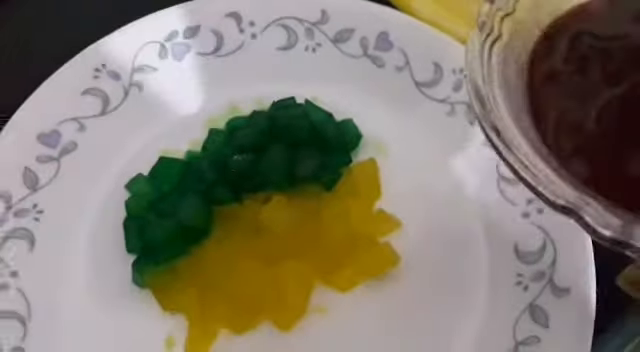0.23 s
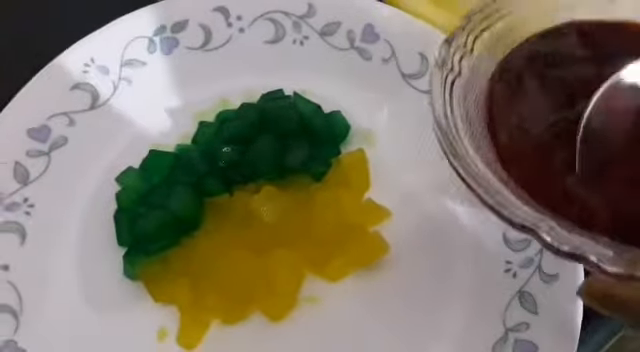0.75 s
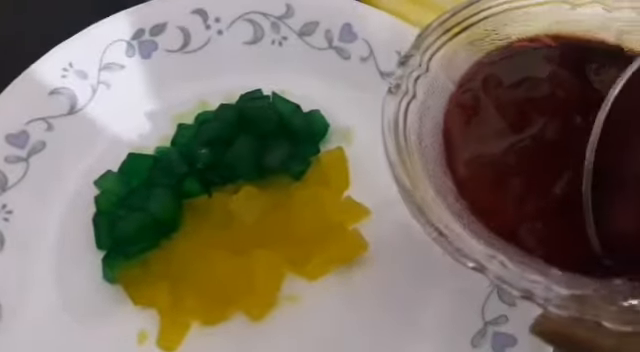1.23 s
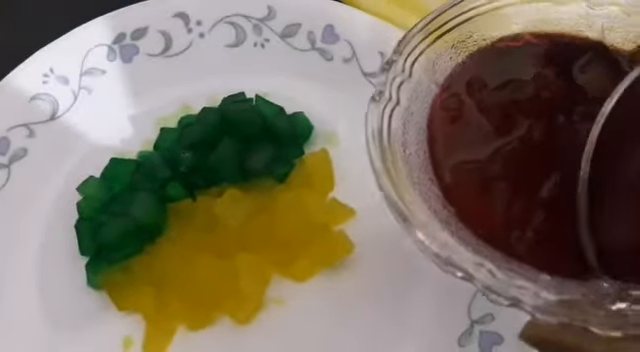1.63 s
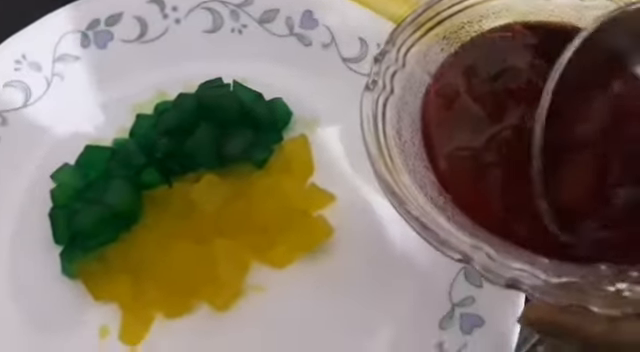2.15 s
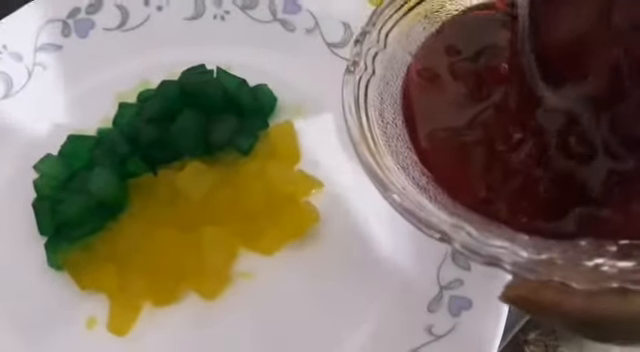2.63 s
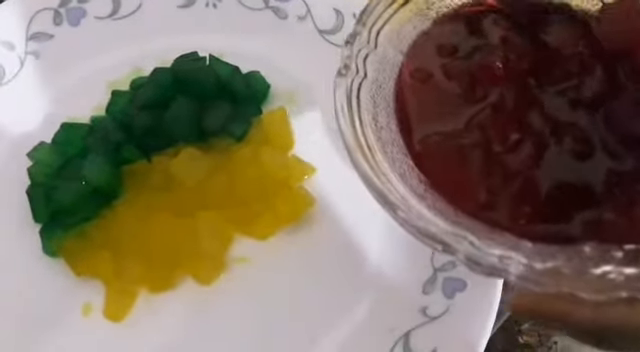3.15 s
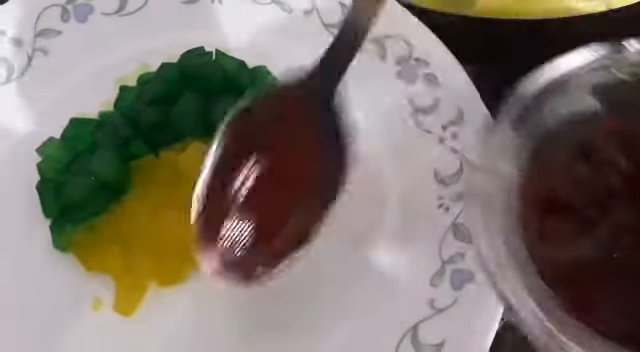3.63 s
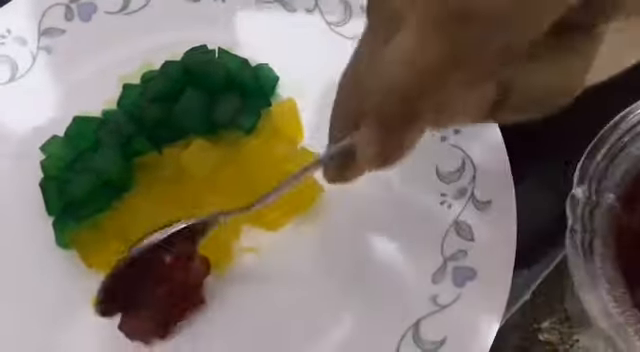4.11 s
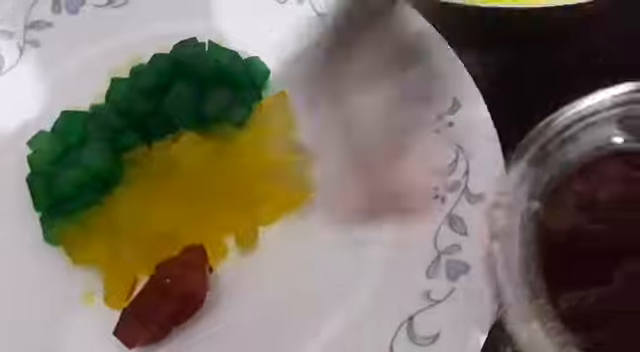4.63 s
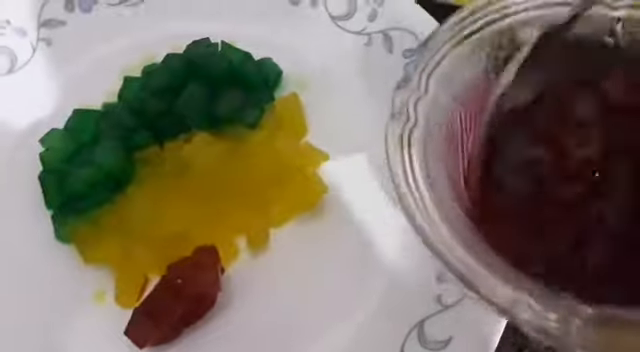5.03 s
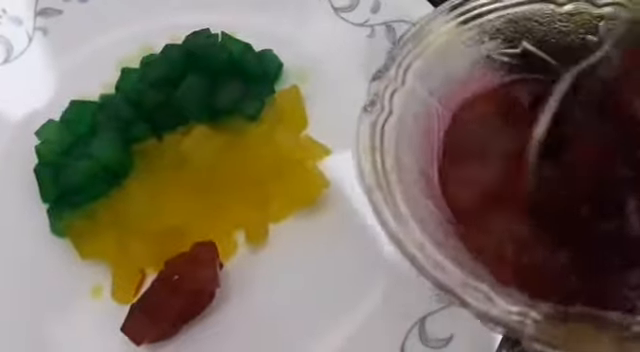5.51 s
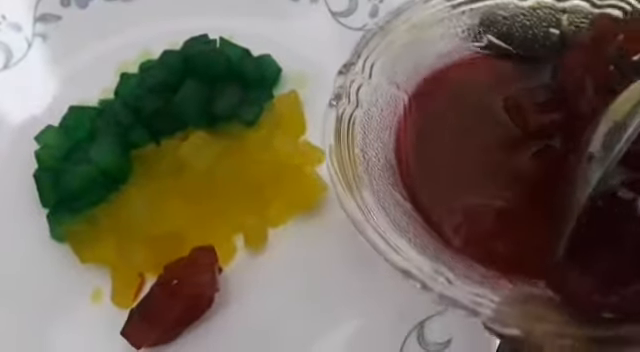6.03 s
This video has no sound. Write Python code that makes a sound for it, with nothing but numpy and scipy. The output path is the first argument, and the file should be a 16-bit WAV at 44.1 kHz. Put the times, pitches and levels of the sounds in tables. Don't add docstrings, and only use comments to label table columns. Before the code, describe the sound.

Short damped glass-and-metal clinks, a pause, then a quick dull trio with a faint scrape, ringing briefly in a small humming kitchen.

```python
import sys
import numpy as np
from scipy import signal
from scipy.fft import rfft, irfft
from scipy.io import wavfile
from scipy.ndimage import uniform_filter1d

SR = 44100
rng = np.random.default_rng(int(sys.argv[2]) if len(sys.argv) > 2 else 0)


def persist_wave(psi):
    counts = np.round(np.clip(psi, -1, 1) * 32767).astype(np.int16)
    wavfile.write(sys.argv[1], SR, np.atleast_2d(counts).T)


def linear_from_db(decibels):
    return 10 ** (np.asarray(decibels, float) / 20)


N = 276198


def evened(x):
    return x / np.sqrt(np.mean(x ** 2) + 1e-20)


def read(points, hz, beyond=None):
    f, value = np.transpose(points)
    return np.interp(np.log(hz + 1), np.log(f + 1), value, right=beyond)


def add(mix, start_s, sound):
    part = mix[round(start_s * SR):][:len(sound)]
    part += sound[:len(part)]


def coloured(x, points):
    gain = linear_from_db(read(points, np.fft.rfftfreq(len(x), 1 / SR)))
    return irfft(rfft(x) * gain, len(x))


def steady(spectrum, level_db, patchy_db):
    # pitch_hz, likeness (0 to 1)
    same_points = [(60, 0.98), (120, 0.99), (240, 1.0), (480, 0.99), (950, 0.98), (1890, 0.99),
                   (3770, 0.765), (7520, 0.29), (15000, 0.77)]
    frames, hz = N // 256 + 5, np.fft.rfftfreq(1024, 1 / SR)
    a, b, c, d, patches = rng.standard_normal((frames, 513, 5)).T
    patches = uniform_filter1d(patches, size=8, axis=0)
    patches = evened(uniform_filter1d(patches, size=14, axis=1))
    same = np.clip(read(same_points, hz), 0, 1)[:, None]
    mid = np.sqrt((1 + same) / 2) * (a + 1j * b)
    side = np.sqrt((1 - same) / 2) * (c + 1j * d)
    colour_db = read(spectrum, hz, beyond=-88.5)[:, None]
    z = np.array([mid + side, mid - side]) * linear_from_db(colour_db + patchy_db * patches)
    noise = signal.istft(z, nperseg=1024, noverlap=768)[1][:, :N]
    return linear_from_db(level_db) * evened(noise)


def hum():
    # pitch_hz, level_db (per Hz)
    hum_colour = [(24, -50), (50, -20), (63, -19), (85, -9), (112, -10), (243, -4), (326, -1), (380, -6),
                  (637, -11), (872, -9.5), (1190, -14), (2400, -16), (2800, -26.5), (6000, -45)]
    extra_db = 3 * np.exp(-np.arange(N) / SR / 0.3)
    return steady(hum_colour, -54 + extra_db, patchy_db=0.89)


def hiss():
    # pitch_hz, level_db (per Hz)
    hiss_colour = [(4000, -38.5), (5500, -18), (7800, -15), (8300, -6.5), (9300, -1), (12000, -1),
                   (15500, -1.5), (15900, -28.5)]
    # start_s, length_s, lift_db
    lifts = [
        (0.3, 1.0, 3.5),
        (5.12, 0.28, 5.5),
        (5.7, .8, 3),
    ]
    t, edge_s = np.arange(N) / SR, 0.15
    level_db = np.full(N, -70.0)
    for start_s, length_s, lift_db in lifts:
        up = np.tanh((t - start_s) / edge_s)
        down = np.tanh((t - start_s - length_s) / edge_s)
        level_db += lift_db * (up - down) / 2
    return steady(hiss_colour, level_db, patchy_db=.6)


def ring(modes, t, rise_s):
    tones = sum(linear_from_db(db - 60 * t / t60) * np.sin(2 * np.pi * hz * t) for hz, db, t60 in modes)
    return (1 - np.exp(-t / rise_s)) * tones


def struck(glass_db, bright, spoon_db, low_hz):
    # pitch_hz, level_db, time_to_fall_60_db_s
    glass_modes = [(1200, -29, .033), (1569, -19.5, .025), (5182, -4, 0.021), (8950, -33, .036),
                   (11500, -36, .03), (12850, -40, .025), (14150, -36, .028), (14750, -38.5, .03)]
    # pitch_hz, level_db, time_to_fall_60_db_s
    spoon_modes = [(2840, -18.5, .022), (3430, -9.5, .018), (4277, 4.4, .015), (4700, -9.5, .014)]
    glass_hz = 2164
    shift = (low_hz / glass_hz) ** .25
    modes = [(low_hz, glass_db, 0.022)]
    for hz, db, t60 in glass_modes:
        modes.append((hz * shift, db + glass_db + bright * np.log2(hz / glass_hz), t60))
    return modes + [(hz, db + spoon_db, t60) for hz, db, t60 in spoon_modes]


def clinks():
    # start_s, glass_db, brightness_db (per octave), spoon_db, scratch_db
    blows = [
        (0.2153, -11, 3.5, -18, -19),
        (0.7684, -15.5, 2, -20.5, -30.5),
        (1.6732, -15.5, 1.8, -30.5, -34),
        (5.0221, -13, -3.5, -47, -39),
        (5.1533, -26.5, 1.5, -18, -28.5),
        (5.345, -22.5, 2, -45, -37),
    ]
    # main_ring_hz, sent_to_walls_db, rebound_ms, rebound_db
    grips = [
        (2260, -0.9, 5.5, -7.5),
        (2186, -2.5, 4.5, -8.5),
        (2137, -4, 5.5, -8.5),
        (2160, -5, 4.7, -10),
        (2050, -6.5, 3, -10.5),
        (2150, -6.5, 1.9, -26),
    ]
    # pitch_hz, level_db
    scratch_colour = [(300, -32), (1100, -13.5), (2500, -18.5), (5500, -29), (7000, -29), (8000, -39.5),
                      (9000, -24.5), (10200, -37), (11600, -19), (13200, -35.5), (14400, -20), (15500, -31)]
    # pitch_hz, level_db
    clatter_colour = [(600, -23.5), (1500, -3.5), (2700, 2.5), (4500, -0.5), (6000, -14), (7000, -22.5),
                      (8000, -55), (9000, -22), (14500, -27)]
    # pitch_hz, strength_db, time_to_fall_60_db_s
    low_ring = [(2130, 0.0015, 0.024)]
    mid_ring = [(3250, 0.0016, 0.06)]
    high_ring = [(5203, 0.0057, 0.01915)]
    top_ring = [(9000, 0.1, 0.018), (11100, 0.1, 0.00901), (14200, 0.1, .011)]
    # pitch_hz, level_db, time_to_fall_60_db_s
    plate_rim = [(2758, -12.5, .01), (3380, -23.5, .022), (3690, -21.5, .024), (4570, -22, .03),
                 (12100, -33, .016)]
    spoon_edge = [(11100, -39, 0.058), (14650, -49, .03)]
    spoon_tip = [(7260, -46.5, .052), (9900, -39.5, .028), (10800, -42, 0.044), (12100, -25, 0.012),
                 (12900, -32, 0.023)]
    plate_well = [(1440, -18, 0.011), (1660, -19.5, 0.012), (2390, -39, .069), (3650, -18.5, 0.011),
                  (6940, -44, .03), (9035, -24, 0.019)]
    spoon_neck = [(3210, -48.5, 0.133), (4080, -25.5, 0.017), (7800, -44.5, 0.027), (8660, -36, 0.02)]
    all_touched = [plate_rim, spoon_edge, [], spoon_tip, plate_well, spoon_neck]

    near, far, t = np.zeros(N), np.zeros(N), np.arange(8192) / SR
    rings = [ring(modes, t, .0008) for modes in (low_ring, mid_ring, high_ring, top_ring)]
    clatter = evened(coloured(signal.unit_impulse(len(t), idx=64), clatter_colour))
    for blow_settings, grip, touched in zip(blows, grips, all_touched):
        start_s, glass_db, bright, spoon_db, scratch_db = blow_settings
        low_hz, out_db, rebound_ms, rebound_db = grip

        scratch = evened(coloured(rng.standard_normal(len(t)), scratch_colour))
        scratch *= linear_from_db(scratch_db - 60 * t / 0.0243) * (1 - np.exp(-t / 0.00054))
        blow = ring(struck(glass_db, bright, spoon_db, low_hz) + touched, t, 0.00064) + scratch
        rebounds = [(0, 0), (rebound_ms, rebound_db), (1.9 * rebound_ms, rebound_db - 6.5)]
        for after_ms, softer_db in rebounds:
            add(near, start_s + after_ms / 1000, linear_from_db(softer_db) * blow)

        damped = ring(struck(glass_db, bright, spoon_db - 3, low_hz) + touched, t, 0.0014)
        clatter_db = -4.5 + .7 * scratch_db
        rings_db = [glass_db - 5.5, spoon_db - 30.5, glass_db - 10 + 2.5 * bright, clatter_db - 10]
        sent = linear_from_db(np.array(rings_db)) @ rings
        sent += linear_from_db(-5 - 60 * t / 0.019) * damped
        sent += linear_from_db(clatter_db - 21.5) * clatter
        add(far, start_s, linear_from_db(out_db) * sent)
    return near, far


def slightly_apart(x, apart_db):
    scatter = rng.standard_normal(256) / 16
    side = linear_from_db(apart_db) * signal.oaconvolve(x, scatter)[:N]
    return np.array([x + side, x - side])


def kitchen(x, tail_db, wide):
    # pitch_hz, time_to_fall_60_db_s
    room_t60 = [(300, .3), (1000, .45), (2200, .5), (4000, .56), (5240, .52), (6500, .52), (9000, .5),
                (15000, .45)]
    # delay_ms, level_db
    echoes = [
        (4.1, -17),
        (7.3, -21.5),
        (10.8, -20.5),
        (15.6, -29),
        (20.5, -32.5),
        (29.5, -24),
    ]
    taps = np.zeros((2, SR))
    at = np.arange(400, SR - 20, 20) + rng.integers(0, 20, (2, (SR - 401) // 20))
    np.put_along_axis(taps, at, rng.choice([-1., 1.], at.shape), 1)
    hz, t, z = signal.stft(taps, SR, nperseg=256)
    fade = linear_from_db(-60 * t / read(room_t60, hz)[:, None])
    tail = signal.istft(z * fade, SR, nperseg=256)[1]
    tail = linear_from_db(tail_db) * tail / np.linalg.norm(tail[0])
    for delay_ms, db in echoes:
        add(tail[0], delay_ms / 1000, linear_from_db(np.array([db])))
    mid, side = signal.fftconvolve(x[None], tail, axes=1)[:, :N]
    return np.array([mid + wide * side, mid - wide * side])


def slides():
    # start_s, length_s, level_db
    rubs = [
        (5.037, 0.072, -51),
        (5.166, 0.064, -69),
    ]
    colour = [(1500, -23), (3000, -12), (6000, -9), (7400, -31), (8400, -26), (10000, -9), (13000, -20)]
    out = np.zeros(N)
    for start_s, length_s, db in rubs:
        size = round(length_s * SR)
        grit = rng.standard_normal(8192) * linear_from_db(3 * rng.exponential(1, 8192))
        grit = evened(coloured(grit, colour))[:size]
        add(out, start_s, linear_from_db(db) * grit * np.hanning(min(size, 8192)))
    return out


def scene():
    near, far = clinks()
    rub = slides()
    direct = slightly_apart(near + rub, apart_db=-29.5)
    room = kitchen(far + rub, tail_db=-4, wide=.02)
    return direct + room + hum()


def thinned(x, rise, quiet_db, thrift_db):
    # pitch_hz, level_db
    line_floor = [(3000, -130), (4200, -110), (4900, -100), (6000, -104), (8200, -104), (8700, -125)]
    # pitch_hz, level_db
    band_floor = [(5500, -145), (6100, -115), (7200, -113), (8300, -110), (9000, -114), (15500, -114)]
    hz, t, z = signal.stft(x, SR, nperseg=1024, noverlap=768)
    power = (abs(z) ** 2).mean(0) + 1e-20
    middle = power[(hz > 2000) & (hz < 6000)].sum(0)
    loud_db = np.clip(10 * np.log10(middle) - quiet_db, 0, 30)
    band_db = 10 * np.log10(abs(uniform_filter1d(power, size=11, axis=0)) + 1e-20)
    frame_db = thrift_db * np.repeat(rng.standard_normal(len(t)), repeats=4)[:len(t)]
    line_over = 10 * np.log10(power) - read(line_floor, hz)[:, None] - frame_db
    band_over = band_db - read(band_floor, hz)[:, None] - rise * loud_db
    keep = (1 + np.tanh(line_over)) * (1 + np.tanh(band_over)) / 4
    return signal.istft(z * keep, SR, nperseg=1024, noverlap=768)[1][:, :N]


def low_pass(x):
    return signal.sosfilt(signal.butter(12, 16440, fs=SR, output="sos"), x)


def record(dry):
    # pitch_hz, level_db
    mic_colour = [(6000, 0.5), (7000, -4.5), (7700, -14), (8300, -3), (8900, -4), (15000, -6), (16000, -24)]
    x = np.array([coloured(channel, mic_colour) for channel in dry]) + hiss()
    x = thinned(x, rise=.9, quiet_db=-68, thrift_db=2.5)
    return low_pass(x)


dry = scene()
out = record(dry)
persist_wave(out)
```